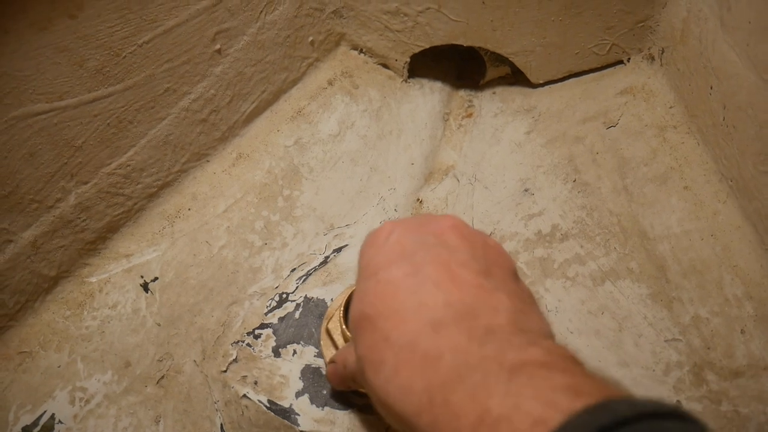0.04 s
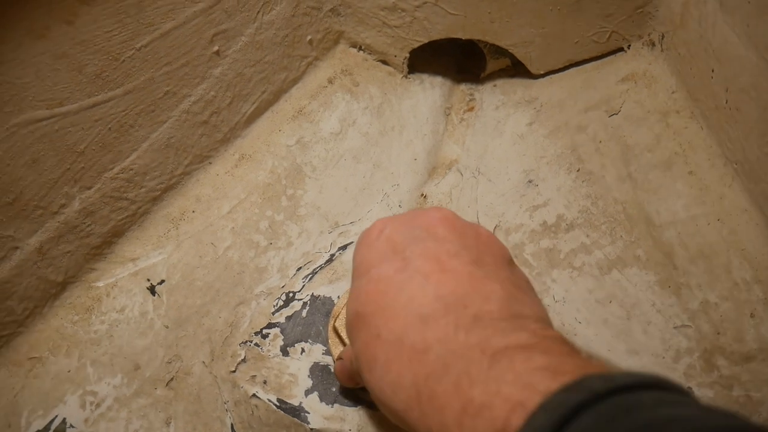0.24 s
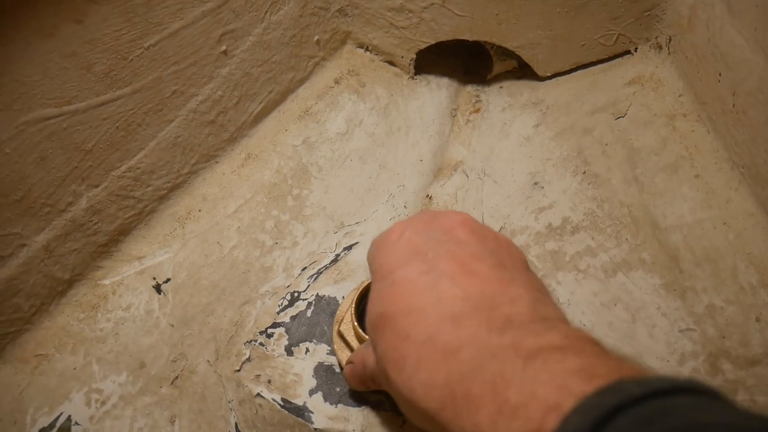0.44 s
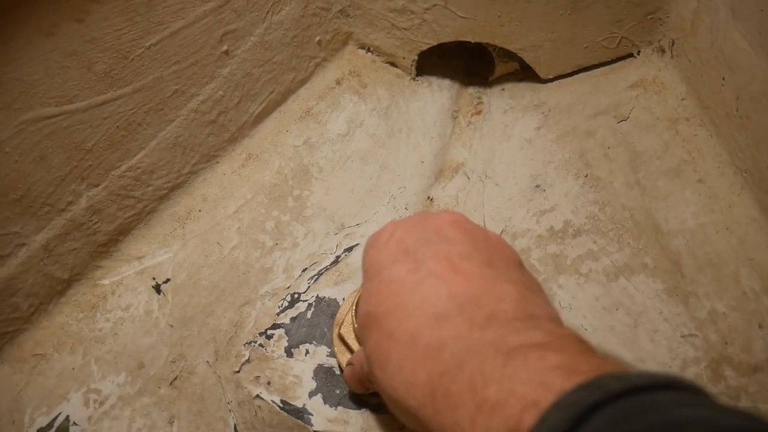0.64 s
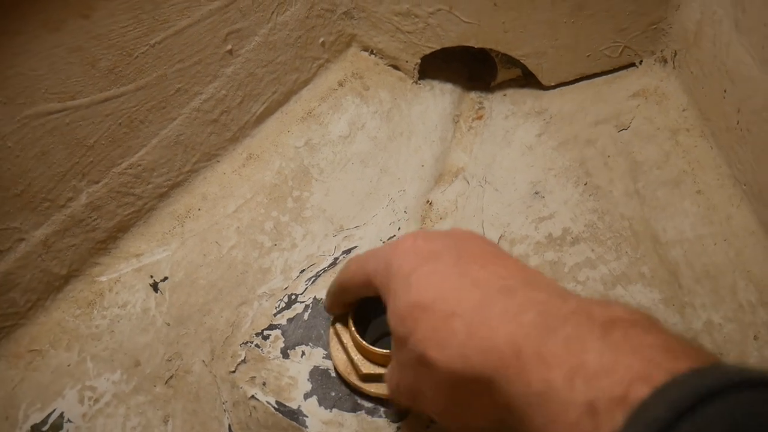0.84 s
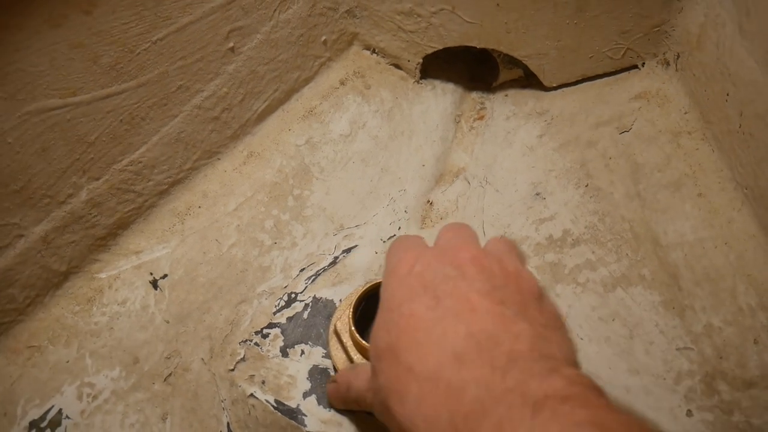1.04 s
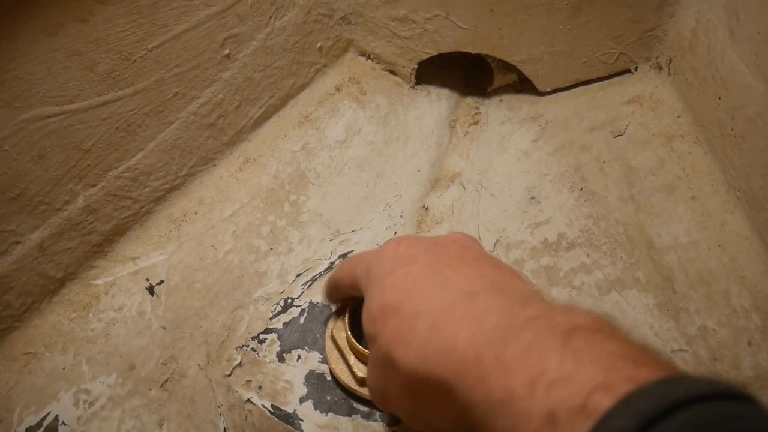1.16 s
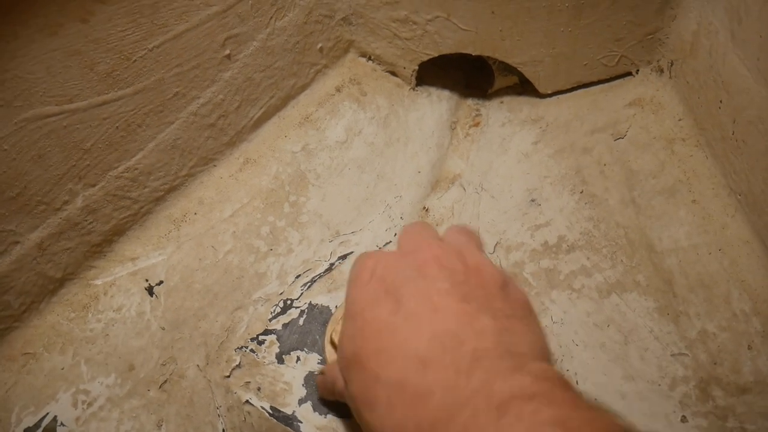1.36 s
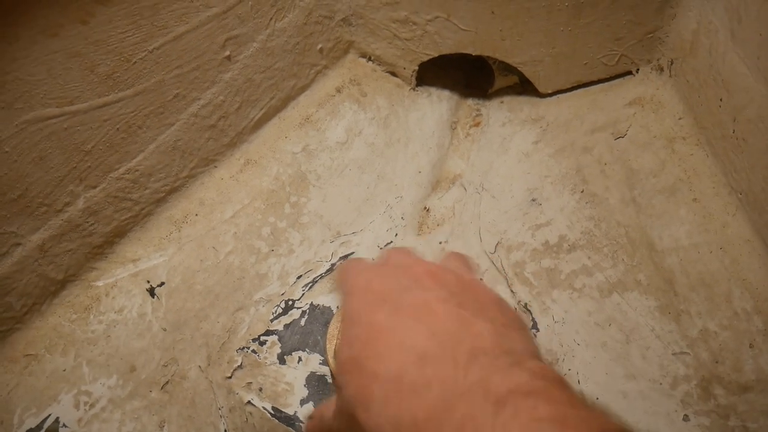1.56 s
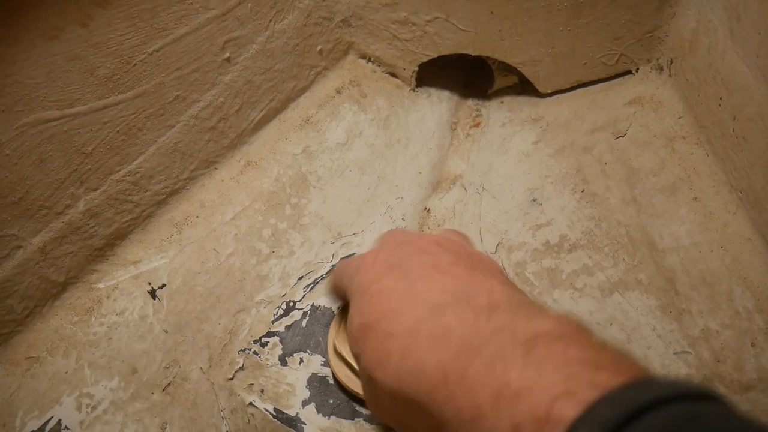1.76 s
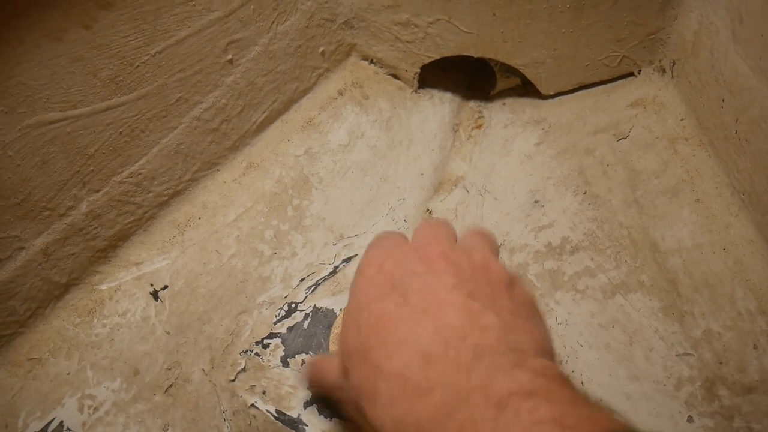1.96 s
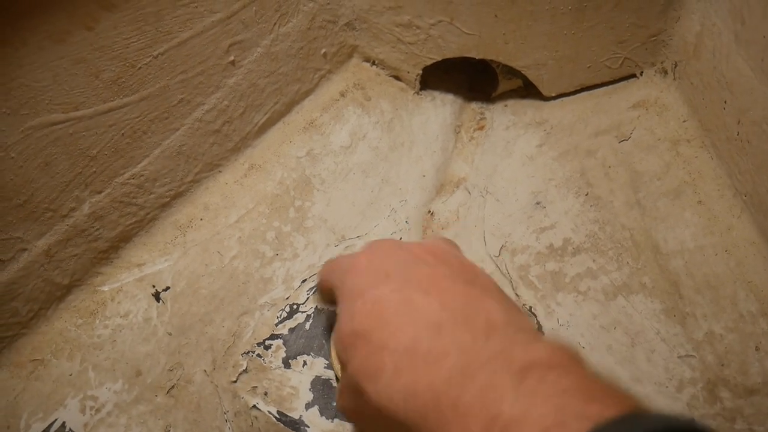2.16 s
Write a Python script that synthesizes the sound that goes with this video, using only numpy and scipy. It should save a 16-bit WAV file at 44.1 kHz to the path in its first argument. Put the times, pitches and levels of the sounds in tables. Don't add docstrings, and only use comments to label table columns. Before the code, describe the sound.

Short rubbing scrapes and squeaks of a stiff metal fitting, with an early hollow knock, heard close

```python
import sys
import numpy as np
from scipy import signal
from scipy.fft import rfft, irfft
from scipy.io import wavfile
from scipy.ndimage import uniform_filter1d

SR = 44100
rng = np.random.default_rng(int(sys.argv[2]) if len(sys.argv) > 2 else 0)


def generate_wav(sig):
    pcm = np.round(np.clip(np.atleast_2d(sig).T, -1, 1) * 32767).astype(np.int16)
    wavfile.write(sys.argv[1], SR, pcm)


def gain_from_decibels(decibels):
    exponent = np.asarray(decibels, float) / 20
    return 10 ** exponent


N = 97020


def evened(x):
    return x / np.sqrt(np.mean(x ** 2) + 1e-20)


def read(points, hz):
    f, value = np.transpose(points)
    return np.interp(np.log(hz + 1), np.log(f + 1), value)


def add(mix, s, sound):
    start = max(round(s * SR), 0)
    part = mix[start:start + len(sound)]
    part += sound[:len(part)]


def colour(x, points):
    hz = np.fft.rfftfreq(len(x), 1 / SR)
    low_cut = np.minimum(hz / points[0][0], 1) ** 3
    return irfft(rfft(x) * gain_from_decibels(read(points, hz)) * low_cut, len(x))


def resonate(x, hz, width):
    turn = np.exp(2j * np.pi * np.cumsum(hz * np.ones(len(x))) / SR)
    r = np.exp(-np.pi * width / SR)
    return 2 * (turn * signal.lfilter([1 - r], [1, -r], x / turn)).real


def air():
    # (frequency [Hz], level [dB])
    air_spectrum = [(30, -4.5), (80, 1.5), (250, -5.5), (550, 0), (1200, -13), (2500, -20.5), (8000, -27),
                    (15500, -33.5)]
    swell_db = evened(uniform_filter1d(rng.standard_normal(N), size=3000))
    return gain_from_decibels(-52.5 + swell_db) * evened(colour(rng.standard_normal(N), air_spectrum))


def fingers():
    # (middle [s], length [s], level [dB], extra level above the split [dB])
    slides = [(0.132, 0.58, -58, -11), (0.187, 0.13, -55.5, -11), (0.51, 0.17, -59.5, -14),
              (0.602, 0.034, -50, -2), (0.876, 0.17, -54, -4.5), (0.995, 0.1, -53.5, 1),
              (1.08, 0.088, -66.5, 5.5), (1.168, 0.067, -50, -4), (1.211, 0.072, -50, -2),
              (1.288, 0.053, -53, -4.5), (1.35, 0.059, -55.5, 0), (1.498, 0.057, -49, 0),
              (1.568, 0.021, -51, -4), (1.587, 0.34, -51, -10.5), (1.646, 0.041, -56, 6),
              (1.72, 0.013, -57, 5), (1.782, 0.095, -52, -5.5), (1.84, 0.034, -52, -7),
              (1.943, 0.3, -58, -2.5), (2.104, 0.047, -54, 1), (2.132, 0.034, -49, 8),
              (2.158, 0.03, -41, -8), (2.2, 0.043, -45, -7)]
    # (frequency [Hz], level [dB])
    hiss_spectrum = [(1060, -12), (1800, -5), (1950, -7.5), (2080, -9.5), (3230, -17), (3470, -13),
                     (9280, -15.5), (15500, -32.5)]
    split_hz, grains_per_s = 6100, 12000

    middle, length, db, top_db = np.transpose(slides)[:, :, None]
    power = gain_from_decibels(2 * db) * np.exp(-8 * ((np.arange(N) / SR - middle) / length) ** 2)
    grain_level = gain_from_decibels(1.2 * rng.exponential(1, N))
    grit = grain_level * rng.standard_normal(N) * (rng.random(N) < grains_per_s / SR)
    hiss = colour(grit, hiss_spectrum)
    peaks_db = 1.3 * evened(uniform_filter1d(rng.standard_normal(N // 2 + 1), size=300))
    hiss = evened(irfft(rfft(hiss) * gain_from_decibels(peaks_db), N))
    low = signal.sosfiltfilt(signal.butter(2, split_hz, fs=SR, output="sos"), hiss)
    low_swell = np.sqrt(power.sum(0))
    top_swell = np.sqrt((power * gain_from_decibels(2 * top_db)).sum(0))
    return low * low_swell + (hiss - low) * top_swell


def rubbing():
    # (peak [s], rise [s], fall [s], pressure [dB], brightness [dB per octave])
    twists = [(.03, 0.081, 0.086, -48, -4.5), (.09, 0.045, 0.033, -48.5, 5.5),
              (0.566, 0.025, 0.093, -50, 3), (.63, 0.051, 0.022, -56, 10.5), (.79, 0.038, 0.034, -57.5, 7),
              (.855, 0.037, 0.06, -44, 3.5), (.92, 0.064, 0.09, -45, 1.5), (.975, 0.021, 0.1, -51, -3),
              (1.187, 0.035, 0.029, -36, 4), (1.225, 0.039, 0.038, -31, -1), (1.29, 0.08, 0.042, -39, -3.5),
              (1.35, 0.036, 0.06, -49.5, -8), (1.465, 0.035, 0.034, -45.5, 6),
              (1.505, 0.036, 0.042, -39, -1.5), (1.533, 0.033, 0.038, -34.5, -3),
              (1.577, 0.022, 0.019, -39.5, -6.5), (1.645, 0.099, 0.057, -41.5, -3.5),
              (1.76, 0.054, 0.11, -43, 0.5), (1.848, 0.026, 0.047, -42.5, 5),
              (1.94, 0.14, 0.099, -48.5, -1.5), (2.1, 0.0088, 0.045, -43.5, 5),
              (2.165, 0.055, 0.046, -34.5, 2), (2.2, 0.03, .04, -33, -5)]
    # (frequency [Hz], width [Hz], level [dB])
    skin = [(279, 86, -7.5), (424, 91, 0), (525, 77, 2.5), (662.6, 29, 4.5), (807, 60, 0.5),
            (1026, 91, -2.5), (1343, 225, -11.5), (1737, 126, -13), (2100, 1280, -29)]
    # (frequency [Hz], width [Hz])
    wrist_modes = [(75, 74), (130, 71), (200, 21)]
    grains_per_s, grain_spread_db, clump_db = 5000, 1.2, 1.0
    rub_db, rumble_db = 11, -12

    t = np.arange(N) / SR
    grain_level = gain_from_decibels(grain_spread_db * rng.exponential(1, N))
    slips = grain_level * rng.standard_normal(N) * (rng.random(N) < grains_per_s / SR)
    clumps = evened(uniform_filter1d(rng.standard_normal(N), size=400))
    drive = evened(slips * gain_from_decibels(clump_db * clumps))

    peak, rise, fall, db, bright_db = np.transpose(twists)[:, :, None]
    from_peak = (t - peak) / np.where(t < peak, rise, fall)
    power = np.exp(-2 * from_peak ** 2) * gain_from_decibels(2 * db)
    body = 0
    for k, (hz, width, mode_db) in enumerate(skin):
        tilt = gain_from_decibels(2 * bright_db * np.log2(hz / 600))
        push = drive * np.sqrt((power * tilt).sum(0))
        mode = resonate(resonate(push, hz, width), hz, 6 * width)
        body = body + (-1) ** k * gain_from_decibels(mode_db) * mode

    shake = rng.standard_normal(N) * power.sum(0) ** 0.34
    rumble = sum(resonate(shake, hz, width) for hz, width in wrist_modes)
    return gain_from_decibels(rub_db) * body + gain_from_decibels(rumble_db) * rumble


def ring(modes, hard_db=0, pitch=1, size=1):
    rise_cycles = 0.59
    t = np.arange(SR // 2 + SR // 4) / SR
    out = np.zeros(len(t))
    for k, (hz, db, t60) in enumerate(modes):
        hardness = hard_db * np.log2(hz / 128) / 2
        decay = gain_from_decibels(db + hardness - 60 * t / t60)
        swell = 1 - np.exp(-(t * hz / rise_cycles) ** 2)
        out += (-1) ** (k // size) * decay * swell * np.sin(2 * np.pi * hz * pitch * t)
    return out


def thread_slips():
    # (time [s], level [dB], frequency [Hz])
    slip_events = [(.023, -39, 600), (.038, -43, 522), (.08, -43.5, 485), (.107, -48, 568),
                   (.826, -43, 484), (.849, -33.5, 1020), (.905, -38, 497), (.953, -38, 860),
                   (.975, -46, 517), (1.057, -41, 513), (1.103, -47, 430), (1.2, -36, 1250),
                   (1.268, -35, 490), (1.295, -38, 480), (1.338, -41, 458), (1.385, -44, 500),
                   (1.455, -44, 1030), (1.496, -29.5, 512), (1.602, -37, 519), (1.642, -39, 700),
                   (1.719, -40, 522), (1.738, -38.5, 530), (1.832, -41, 1400), (1.976, -44.5, 265),
                   (2.036, -44.5, 517), (2.108, -40, 440), (2.152, -30, 470)]
    cycles, partner = 27, 1.55
    out = np.zeros(N)
    for s, db, hz in slip_events:
        t60 = cycles / hz
        add(out, s, ring([(hz, db, t60), (hz * partner, db - 11, t60 / 2)]))
    return out


def sing(rows, q, steady):
    out = np.zeros(N)
    for s, length, db, hz in rows:
        u = np.arange(0, length + .03, 1 / SR) / length
        width = hz / q + 20
        arch = np.sin(np.pi * np.minimum(u, 1))
        push = rng.standard_normal(12000)[:len(u)] * np.sqrt(arch.clip(0))
        fuzz = np.sqrt(SR / width / 6) * resonate(resonate(push, hz, width), hz, 3 * width)
        tone = arch * np.sin(2 * np.pi * hz * u * length)
        add(out, s, gain_from_decibels(db) * (steady * tone + (1 - steady / 2) * fuzz))
    return out


def thread_squeaks():
    # (start [s], length [s], level [dB], pitch [Hz])
    squeaks = [(0.55, 0.1, -49, 81), (.775, .05, -53, 1020), (.87, .045, -49, 1030), (0.945, .04, -47, 780),
               (1.195, .05, -35, 655), (1.215, .1, -37, 460), (1.5, 0.032, -50, 990),
               (1.152, 0.05, -39, 1470), (1.185, 0.057, -35, 1050), (1.520, 0.087, -49.5, 1650),
               (1.62, 0.089, -50.5, 1760), (1.497, 0.084, -38, 515), (1.52, 0.048, -42, 655),
               (0.91, .14, -50.5, 490), (.96, 0.13, -49, 520), (.135, 0.032, -48.5, 144),
               (1.1, 0.048, -47.5, 72), (1.56, .05, -57, 3900), (1.63, 0.05, -63, 4250),
               (1.840, 0.023, -44, 1020), (2.005, 0.027, -51.5, 840), (2.076, 0.042, -41, 1050),
               (2.16, 0.035, -39, 137), (2.15, .05, -39, 450), (2.17, .03, -40.5, 680),
               (2.150, 0.024, -36.5, 1020), (2.18, .03, -38, 990)]
    return sing(squeaks, q=14, steady=.7)


def diffuse():
    # (frequency [Hz], level [dB])
    tail_spectrum = [(60, -35), (130, -10.5), (350, 7), (800, -14.5), (2000, -26.5), (5000, -47),
                     (12000, -45)]
    # (frequency [Hz], t60 [s])
    tail_t60 = [(100, 0.73), (400, 0.29), (1200, 0.3), (3000, 0.33), (8000, 0.044)]
    rise_s = 0.0037
    hz, t, z = signal.stft(rng.standard_normal(SR // 2), SR, nperseg=256, noverlap=192)
    start_db = read(tail_spectrum, hz)[:, None]
    fall_db = 60 * t / read(tail_t60, hz)[:, None]
    tail = signal.istft(z * gain_from_decibels(start_db - fall_db), SR, nperseg=256, noverlap=192)[1]
    return tail * np.minimum(np.arange(len(tail)) / (rise_s * SR), 1)


def knock():
    # (time [s], level [dB], hardness added to the upper modes [dB])
    blows = [
        (0.21, -11, 0.5),
        (0.284, -15, -12),
        (0.334, -17, -16),
        (0.427, -36, -16),
    ]
    # (frequency [Hz], level [dB], t60 [s])
    brass = [(4280, -33, 0.0015), (5520, -9, 0.0052), (6740, -21, 0.0055), (8300, -24.5, 0.0061),
             (10200, -23, 0.0036)]
    # (frequency [Hz], level [dB], t60 [s])
    hull = [(75.8, -8.5, 0.55), (87.1, -7.5, 0.6), (102.3, -6.5, 0.24), (115.5, -6, 0.38), (130, -3, 0.56),
            (125.7, 3, 0.27), (141.3, 1, 0.34), (246.2, -9.5, 0.39), (298.4, -11, 0.4), (343, -10.5, 0.44),
            (400.7, -13, 0.3)]
    # (frequency [Hz], level [dB], t60 [s])
    seat = [(798, -17, 0.065), (1148, -18.5, 0.03), (1300, -6, 0.027), (1468, -20.5, 0.065),
            (1617, -10.5, 0.021), (1990, -17, .015)]
    # (frequency [Hz], level [dB], t60 [s])
    thud = [(248, -12.5, 0.077), (282, -8, .05), (340, -9, .08)]
    # (frequency [Hz], level [dB], t60 [s])
    panel = [(246.5, 1.5, 0.057), (277, -1.5, 0.054), (339.5, -0.5, 0.071), (414.6, 6, .06),
             (468, -1, 0.057), (554.5, 2.5, 0.05), (691, -10, 0.15), (798, -2.5, 0.08), (928, -18, 0.041),
             (1334, -7, 0.033), (1584, -9.5, 0.038), (1850, -8.5, 0.031), (2137, -4.5, 0.021),
             (3150, -4, 0.016)]
    seat_s, thud_s, diffuse_db = .2128, .2145, 12

    out = np.zeros(N)
    first_s, first_db, _ = blows[0]
    add(out, first_s, gain_from_decibels(first_db) * (ring(brass) - ring(hull)))
    add(out, seat_s, ring(seat))
    add(out, thud_s, ring(thud, size=3))
    for s, db, hard_db in blows:
        pitch = rng.uniform(.97, 1.03) if hard_db < -1 else 1
        add(out, s, gain_from_decibels(db) * ring(panel, hard_db, pitch, size=2))
        add(out, s, gain_from_decibels(db + diffuse_db + hard_db) * diffuse())
    return out


def knuckle_bumps():
    # (time [s], level [dB])
    bumps = [
        (0.591, -20),
        (0.641, -35.5),
        (.668, -44),
    ]
    # (frequency [Hz], level [dB], t60 [s])
    floorboard = [(199, -2, 0.096), (234, -6.5, 0.049), (348, -10, 0.083), (447, -12.5, 0.045),
                  (600, -23, .05), (847, -19, 0.059), (913, -21, 0.053), (1090, -24, 0.14),
                  (1310, -27, .06)]
    out = np.zeros(N)
    for (s, db), pitch in zip(bumps, [0.99, 0.91, 1.02]):
        add(out, s, gain_from_decibels(db) * ring(floorboard, pitch=pitch))
        add(out, s, gain_from_decibels(db - 4.0) * diffuse())
    return out


def brass_chirps():
    # (start [s], length [s], level [dB], pitch [Hz])
    chirps = [(0.593, 0.0077, -47, 4810), (0.595, 0.0056, -48, 6650), (1.172, 0.024, -50, 4820),
              (1.192, .035, -55.5, 9650), (1.377, 0.018, -60, 8300), (1.483, .014, -50, 8370),
              (1.49, .01, -49, 9730), (1.760, 0.054, -61, 6700), (1.765, .02, -55, 5170),
              (1.829, .016, -48, 4880), (2.103, .008, -46, 4880), (2.118, 0.01, -51, 9460)]
    return sing(chirps, q=70, steady=.4)


def scene():
    friction = fingers() + rubbing() + thread_slips() + thread_squeaks() + brass_chirps()
    return (air() + friction + knock() + knuckle_bumps())[None]


def band_limit(x):
    return signal.sosfilt(signal.butter(12, 16190, fs=SR, output="sos"), x)


def record(dry):
    limit, low_hz, top_hz = .88, 62, 15750
    x = limit * np.tanh(dry / limit)
    x = signal.sosfilt(signal.butter(2, low_hz, "high", fs=SR, output="sos"), x)
    x = signal.sosfiltfilt(signal.cheby2(12, 40, top_hz + 450, fs=SR, output="sos"), x)
    return band_limit(x)


dry = scene()
out = record(dry)
generate_wav(out)
```